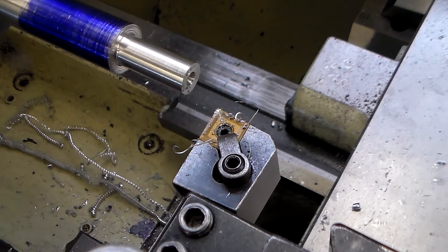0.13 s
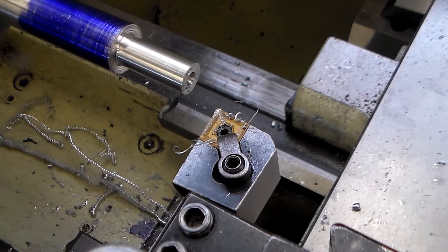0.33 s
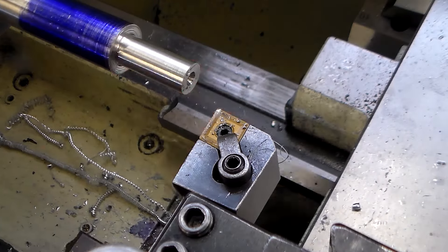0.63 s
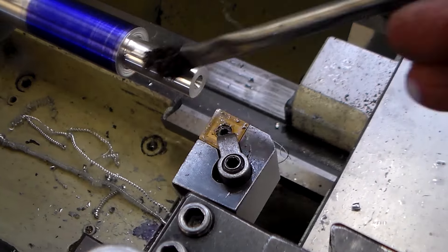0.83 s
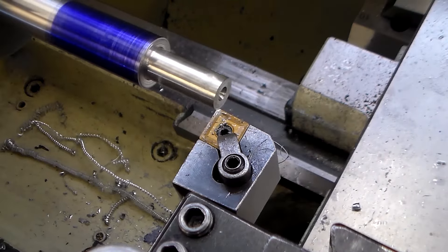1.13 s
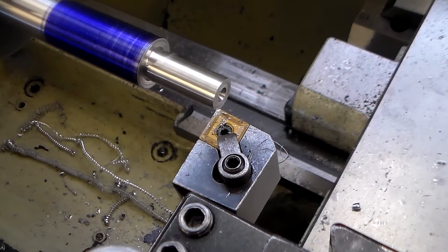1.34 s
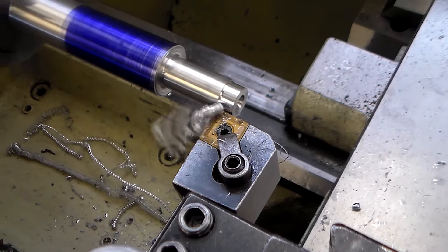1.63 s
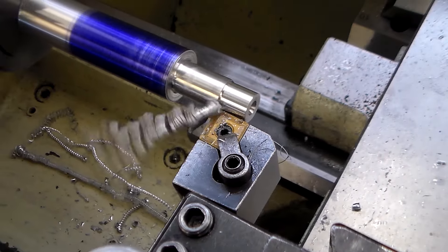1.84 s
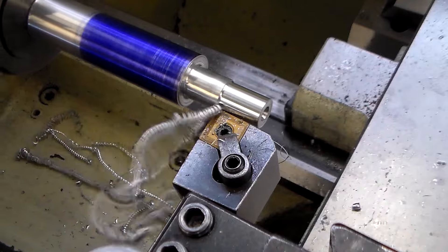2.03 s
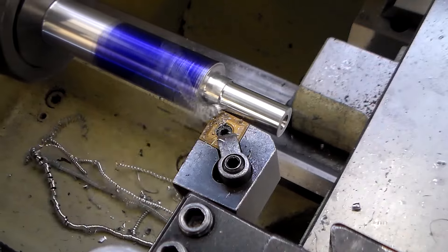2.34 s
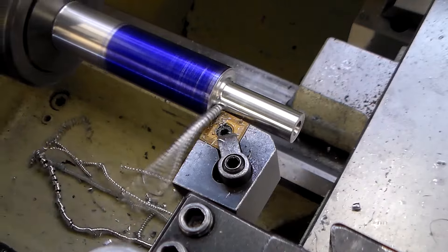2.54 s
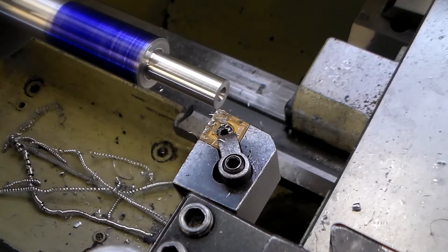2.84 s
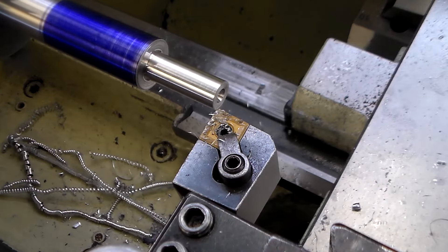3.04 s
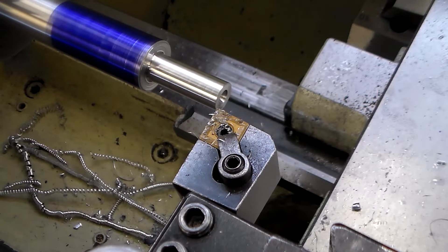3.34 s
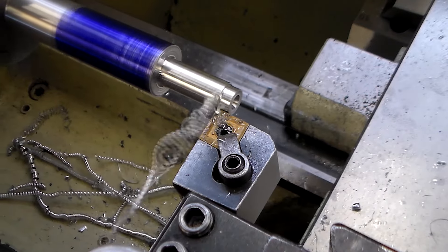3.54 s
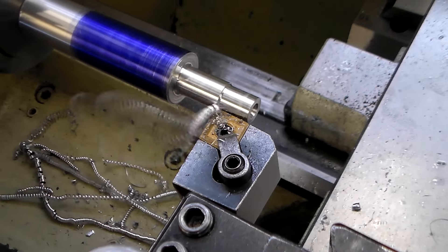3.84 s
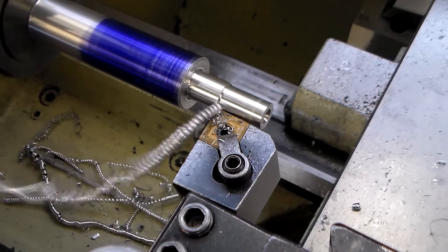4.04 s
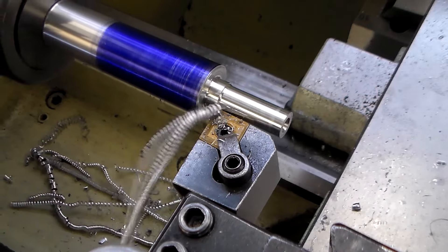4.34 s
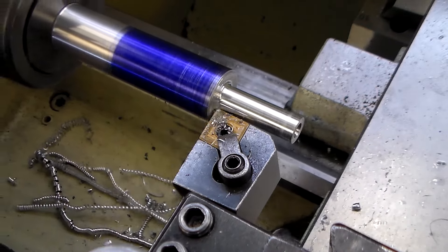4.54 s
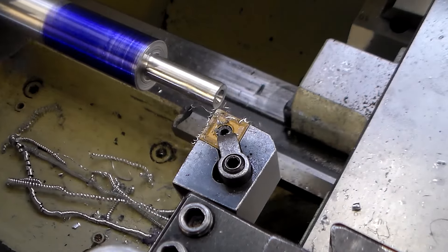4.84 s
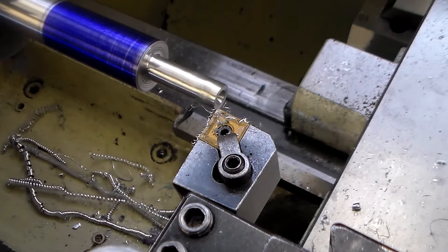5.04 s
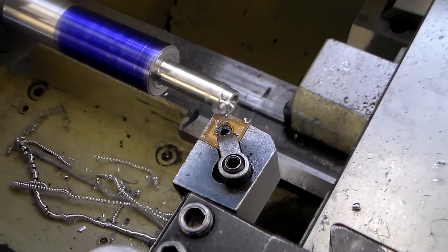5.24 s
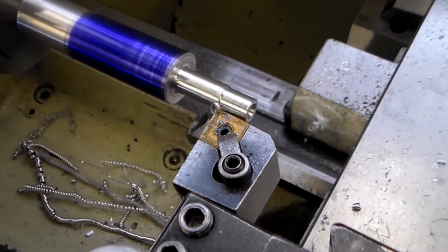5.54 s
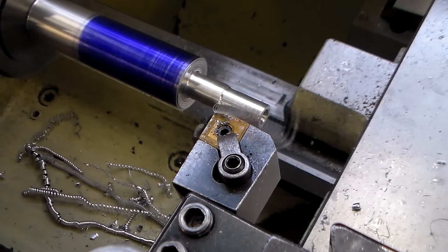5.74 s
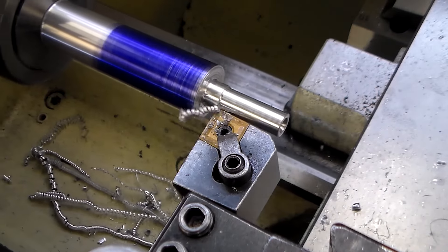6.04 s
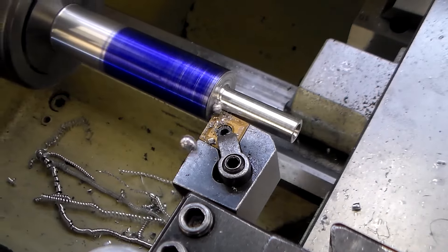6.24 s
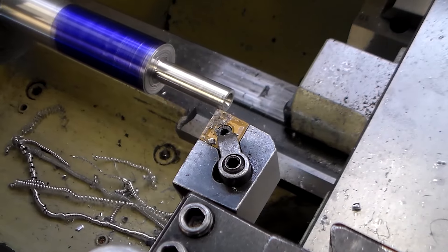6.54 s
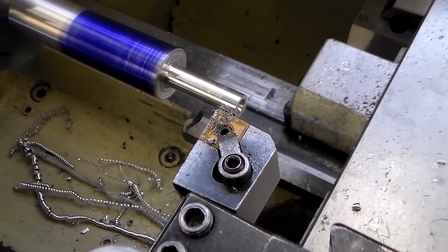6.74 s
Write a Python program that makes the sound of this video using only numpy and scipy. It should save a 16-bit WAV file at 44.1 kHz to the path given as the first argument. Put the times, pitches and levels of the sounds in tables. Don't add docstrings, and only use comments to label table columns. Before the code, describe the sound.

A close stereo camera microphone hears quiet airy fan noise and thin hum, then two hard clicks milliseconds apart. Immediately a motor rises in a quick chirp into a bright, dense, shrill drone, leaning slightly left. Three finishing passes make the tones dip a little and the hiss shift; soft pings of swarf on a tray come later. The whine never stops.

```python
import sys
import numpy as np
from scipy import signal
from scipy.fft import rfft, irfft, next_fast_len
from scipy.io import wavfile
from scipy.ndimage import uniform_filter1d, map_coordinates

SR = 44100
rng = np.random.default_rng(int(sys.argv[2]) if len(sys.argv) > 2 else 0)


def amplitude_ratio(level_db):
    exponent = np.asarray(level_db, float) / 20
    return 10 ** exponent


def waveform_to_disk(signal):
    frames = np.transpose(np.atleast_2d(signal))
    scaled = np.clip(frames, -1, 1) * 32767
    samples = np.round(scaled).astype(np.int16)
    wavfile.write(sys.argv[1], SR, samples)


N = 303408
TIME = np.arange(N) / SR

# [f/Hz, level/dB per Hz]
AIR = [(15, -63), (25, -15), (333, -15.5), (380, -14.5), (447, -8), (485, -17.5), (878, -18.5),
       (1500, -18.5), (1820, -18), (2080, -11.5), (2320, -14), (3050, -18), (3470, -20), (4670, -27.5),
       (15700, -22.5)]
# [f/Hz, width/Hz, level/dB]
AIR_HUMPS = [(2252, 42, 9), (2340, 36, 4.5), (2720, 55, 7.5), (2910, 42, 9), (4740, 660, 15.5),
             (5600, 100, 3), (7800, 1200, 9), (9760, 630, 6.5)]
# [f/Hz, likeness/0-1]
AIR_ALIKE = [(60, 0.25), (180, 0.48), (550, 0.62), (1650, 1), (4970, 1), (15000, 0.84)]
# [f/Hz, left-right/dB]
AIR_LEAN = [(60, 0.5), (180, 0.36), (550, 0.87), (1650, 6.5), (4970, 4.2), (15000, 0.5)]
# [f/Hz, level/dB]
HUM = [(449.3, -59), (899, -69), (1799, -68), (2258, -66), (2686, -68), (3165, -66), (3266, -57),
       (3919, -71), (4572, -61), (4749, -69), (5400, -67), (9502, -69), (13550, -73)]
# [t/s, level/dB, length/s]
BRUSHES = [
    (.01, -57, .03),
    (.27, -56, .03),
    (.51, -56, .06),
]
BRUSH_REST_DB = -68

# [t/s, peak/dB, thump/dB]
RELAY = [
    (.7793, -26, -40),
    (.7862, -18, -47),
]
# [f/Hz, level/dB, 60 dB decay/s]
RELAY_CASE = [(1400, -10, .012), (2300, -11, .007), (3000, -11, .007), (3900, -10, .006), (5300, -3, .025),
              (6500, -5, .006), (8300, -7, .015), (9500, -4, .006), (11500, -8, .005), (15500, -5, .008)]

# [t/s, peak/dB, f/Hz, 60 dB decay/s]
SWARF = [
    (3.44, -39, 3520, .07),
    (4.871, -35.5, 2680, .06),
    (5.37, -42.5, 3180, 0.092),
    (5.54, -39, 3550, 0.069),
    (5.87, -44, 5800, .05),
    (6.03, -38.5, 3180, .06),
    (6.05, -33, 3520, 0.052),
    (6.42, -58, 533, 0.17),
]

# [tool bites t/s, tool leaves t/s, depth/0-1]
CUTS = [
    (1.42, 2.715, 1),
    (3.395, 4.64, 0.84),
    (5.17, 6.26, 0.53),
]
BITE_S, LEAVE_S = 0.088, 0.21
CUT_HISS_DB, CUT_LOW_DB, CUT_STEP_DB, CUT_GAIN_DB = 0.78, -1.5, -6, -2
# [t/s, low tones/dB, hiss/dB]
JOLTS = [
    (1.36, 0, -0.5),
    (3.03, 2.5, -0.6),
    (3.43, 3, 0.5),
    (4.72, -3, -1.5),
    (4.82, 2.5, -.3),
    (5.24, 0, -0.7),
]
JOLT_S = 0.1
# [from t/s, to t/s, level reached/dB]
PULLS = [
    (1.6, 2.48, -60),
    (4.8, 7.2, -56),
]
PULL_GROWS_DB, PULL_REST_DB = 8.5, -69

# [t/s, step rate f/Hz]
RUNUP = [
    (.83, 900),
    (0.846, 1350),
    (0.86, 2375),
    (0.878, 3800),
    (0.895, 4380),
    (0.93, 4450),
]
FULL_RATE_HZ, STEP_HZ, STEPS_PER_TURN = 4450, 4448.5, 240
# [t/s, level/dB]
START = [
    (.8, -49),
    (.83, -25),
    (.8455, -19),
    (.8495, -10.5),
    (.87, -5.5),
    (.9, -4.5),
]
# [t/s, f/Hz]
WHINE = [
    (0.88, 2637),
    (0.94, 2654),
    (6.8, 2650),
    (6.88, 2670),
]
# [f/Hz, level/dB per Hz]
RUMBLE = [(15, -34), (25, -5.5), (192, -4.5), (289, -3), (726, -5.5), (827, -8.5), (1200, -23), (1560, -33),
          (2640, -120)]

# [order/cycles per turn, level/dB]
HALF_STEP = [(119, -59), (120, -60), (121, -61)]
# [order/cycles per turn, level/dB]
STEP = [(238, -64), (239, -61), (239.5, -64), (240, -48), (241, -57), (243.6, -62)]
# [order/cycles per turn, level/dB]
DOUBLE_STEP = [(472, -57), (473, -57), (474, -56), (475, -56), (476, -54), (477, -53), (478, -51),
               (479, -47), (480, -46), (481, -46), (482, -49), (483, -54), (484, -55)]
# [order/cycles per turn, level/dB]
TRIPLE_STEP = [(711, -59), (715, -60), (716, -56), (717, -55), (718, -55), (719.7, -60), (720.6, -57)]
# [order/cycles per turn, level/dB]
BELT = [(72, -69), (77.1, -73), (87, -71), (357.3, -58), (383.4, -57), (384, -58), (637, -62), (638, -63),
        (640, -63), (641, -61)]
# [trim/dB, left-right/dB, right lead/rad, share of cutting load]
HEARD = [
    (-0.5, 2.5, 0.52, 0.64),
    (1, 12, -2, 0.66),
    (1, 3, 0.47, 0.022),
    (1.5, -3, 0.5, .05),
    (2, 4, 1, .1),
]
RUNUP_GAIN = [
    -20,
    4,
    -5,
    -2,
    -30,
]

# [f/Hz, level/dB]
BETWEEN = [(600, -40), (1200, -24), (2500, -38), (5000, -16), (9000, -7), (15000, -11)]
# [f/Hz, width/Hz, level/dB, left-right/dB, right lead/rad]
FRAME_RESONANCES = [(1330, 70, -9, -2, 0.5), (1460, 120, -15, 0, 0.5), (1620, 90, -6, 1, 0.4), (1760, 160, -14, 3, 0.4),
                    (2000, 100, -11, 5, 0.2), (2220, 60, -5, 3, 0.1), (2370, 160, -9, 2, 0), (2530, 110, -8, 2, 0),
                    (2780, 210, -10, 3, 0.0), (3190, 90, -6, 2, 0.0), (3540, 430, -9, 2, 0.0), (4000, 260, -5, 1, 0.0),
                    (4310, 50, -3, -3, 0.6), (4380, 100, -1, -9, 2.0),
                    (4460, 60, -1, 10, -2.3), (4750, 110, -2, 4, 0.3), (4970, 160, -3, 2, 0.3), (5220, 90, 6, 3, 0.3),
         (5350, 140, -2, 2, 0.2), (5790, 40, -2, 3, 0.2), (6020, 340, -5, 9, 0.2), (6230, 40, 2, 4, 0.2),
         (6360, 110, -3, 4, 0.5), (6630, 90, 5, 0, 0.6), (6690, 90, 3, 7, 0.5), (6920, 80, -2, -1, 0.1),
         (7120, 80, 4, 2, 0.4), (7250, 70, 3, 2, 0.3),
                    (7540, 90, -7, 4, 0.2), (7740, 110, -2, 3, 0.3), (7920, 70, -4, 2, 0.3), (8170, 100, -1, 2, 0.3),
        (8310, 90, -2, 2, 0.4), (8440, 80, 1, 1, 0.4), (8640, 80, 3, 3, 0.4), (8760, 100, 4, 2, 0.3),
        (8900, 90, 7, 2, 0.4), (9040, 130, 1, 2, 0.3), (9290, 170, -2, 1, 0.3), (9460, 60, 0, 1, 0.3),
        (9650, 170, -2, 2, 0.2),
                    (10260, 170, 3, 1, 0.4), (11160, 100, -6, 0, 0.2), (11860, 80, -2, 0, 0.2),
          (12050, 150, -1, -2, 0.3), (12200, 120, -2, 0, 0.1), (13100, 480, -4, 1, 0.1),
          (13260, 180, 3, -2, 0.1), (13760, 80, -4, 0, 0.1), (14070, 340, -8, 0, 0.0),
          (14650, 230, -9, 0, 0.0), (15150, 320, -4, 0, 0.0), (15630, 160, 1, 0, 0.0),
          (15700, 60, -1, 0, 0)]


def unit(x):
    return x / np.sqrt(np.mean(x ** 2) + 1e-20)


def along(points, hz):
    f, v = np.transpose(points)
    return np.interp(np.log(hz + 1), np.log(f + 1), v)


def curves(rows):
    s, *cols = np.transpose(rows)
    return [np.interp(TIME, s, c) for c in cols]


def wobble(rate):
    return map_coordinates(rng.standard_normal(int(N * rate / SR) + 4), [TIME * rate])


def noise():
    return rng.standard_normal(N)


def hump(hz, centre, width, power=2):
    return 1 / (1 + ((hz - centre) / width) ** power)


def filtered(x, response):
    m = next_fast_len(N + 8192)
    return irfft(rfft(x, m) * response(np.fft.rfftfreq(m, 1 / SR)), m)[..., :N]


def sides(db):
    return amplitude_ratio(np.array([db / 2, -db / 2]))


def placed(x, db):
    return sides(db)[:, None] * x


def pair(shape, alike):
    def mid_side(hz):
        turn = np.arccos(np.clip(alike(hz), -1, 1)) / 2
        return shape(hz) * np.array([np.cos(turn), np.sin(turn)])

    mid, side = filtered(rng.standard_normal((2, N)), mid_side)
    return unit(np.array([mid + side, mid - side]))


def fan_air():
    def shape(hz):
        humps = sum(db * hump(hz, c, w) for c, w, db in AIR_HUMPS)
        return amplitude_ratio(along(AIR, hz) + humps)

    air = pair(shape, lambda hz: along(AIR_ALIKE, hz))
    air = filtered(air, lambda hz: sides(along(AIR_LEAN, hz)))
    return amplitude_ratio(-46.5 + 0.64 * wobble(2.9)) * air


def hum():
    out = 0
    for hz, db in HUM:
        level = amplitude_ratio(db + 3.5 + 0.65 * wobble(7.9))
        out = out + level * np.sin(2 * np.pi * hz * TIME + 0.7 * wobble(4.66))
    return placed(out, 1.5)


def belt_brush():
    hiss = unit(filtered(noise(), lambda hz: hump(hz, 8000, 300) + 0.98 * hump(hz, 9400, 300)))
    puffs = sum(amplitude_ratio(db) * np.exp(-((TIME - s) / length) ** 2) for s, db, length in BRUSHES)
    return (amplitude_ratio(BRUSH_REST_DB) + puffs) * hiss


def relay():
    out, t = np.zeros(N), TIME[:SR // 8]
    for s, db, thump_db in RELAY:
        ring = 0
        for hz, level, t60 in RELAY_CASE:
            ring = ring + amplitude_ratio(level + rng.normal(0, 1.2) - 60 * t / t60) * np.sin(2 * np.pi * hz * t)
        fade = amplitude_ratio(-60 * t / 0.0021) + 0.13 * amplitude_ratio(-60 * t / 0.027)
        crack = fade * signal.lfilter([1, -.9], 1, rng.standard_normal(len(t)))
        thump = amplitude_ratio(thump_db + 15 - 60 * t / 0.066) * np.sin(2 * np.pi * 35 * t)
        onset = 1 - np.exp(-t / 0.00017)
        out[round(s * SR):][:len(t)] += amplitude_ratio(db - 6.5) * ((ring + 2.2 * crack) * onset + thump)
    return placed(out, 5.3)


def swarf():
    out, t = np.zeros(N + SR), TIME[:SR // 4]
    for s, db, hz, t60 in SWARF:
        level = amplitude_ratio(db + 11.5 - 60 * t / t60) * (1 - np.exp(-t / 0.0044))
        ping = level * np.sin(2 * np.pi * hz * t + 1.3 * wobble(147)[:len(t)])
        out[round(s * SR):][:len(t)] += ping
    return placed(out[:N], 2.)


def cutting():
    load = 0
    for bite, leave, depth in CUTS:
        rise, fall = (TIME - bite) / BITE_S, 1 - (TIME - leave) / LEAVE_S
        load = load + depth * np.clip(np.minimum(rise, fall), 0, 1)
    return load


def rumble(on):
    low_noise = unit(filtered(noise(), lambda hz: amplitude_ratio(along(RUMBLE, hz))))
    return placed(amplitude_ratio(-48.0) * on * low_noise, 25.1) / 4


def feed_drive(on):
    level = amplitude_ratio(PULL_REST_DB)
    for start, end, db in PULLS:
        left = np.clip((end - TIME) / (end - start), 0, 1)
        level = level + amplitude_ratio(db - PULL_GROWS_DB * left) * (TIME > start) * (TIME < end)
    return on * level * unit(filtered(noise(), lambda hz: hump(hz, 1040, 35)))


def drive_whine():
    phase = 2 * np.pi * np.cumsum(curves(WHINE)[0]) / SR + 0.12 * wobble(30)
    whine = amplitude_ratio(-32.5 + 0.18 * wobble(13)) * np.sin(phase)
    return placed(whine * np.clip((TIME - .862) / 0.018, 0, 1), 4.7)


def frame_response(hz):
    power, lead = np.array([1, 1])[:, None] * amplitude_ratio(2 * along(BETWEEN, hz)), 0
    for c, w, db, pan_db, rad in FRAME_RESONANCES:
        peak = amplitude_ratio(2 * db) / (1 + (2 * (hz - c) / w) ** 2) ** 1.5
        power = power + peak * sides(2 * pan_db)[:, None]
        lead = lead + peak * rad
    return np.sqrt(power) * np.exp(1j * np.array([-.5, .5])[:, None] * lead / power.mean(0))


def swelling(x, swell_db):
    z = signal.stft(x, nperseg=512)[2]
    field = uniform_filter1d(rng.standard_normal(z.shape[1:]), 14, 0)
    field = uniform_filter1d(field, 50, 1)
    return signal.istft(z * amplitude_ratio(swell_db * unit(field)), nperseg=512)[1][:, :N]


def shaken_frame(turns, on, cut):
    pattern = rng.standard_normal(2380)[(turns % 1 * 2380).astype(int)]
    throb = map_coordinates(rng.standard_normal(12), [turns % 1 * 12], mode="grid-wrap")
    rub = noise() + .25 * pattern
    rub *= amplitude_ratio(.5 * throb + 0.36 * wobble(60) + 0.13 * wobble(11) + 0.35 * wobble(300))
    apart = filtered(rng.standard_normal((2, N)),
                     lambda hz: 0.18 + .5 * hump(hz, 0, 1800, 4) + 0.16 * hump(hz, 6000, 700))
    body = unit(filtered(on * (rub + apart), frame_response))
    low = filtered(body, lambda hz: hump(hz, 0, 2000, 8))
    jolt_db, jolt_hiss_db = sum(np.outer(db, np.exp(-((TIME - s) / JOLT_S) ** 2)) for s, *db in JOLTS)
    hiss = amplitude_ratio(CUT_HISS_DB * cut + jolt_hiss_db - 27.5) * swelling(body - low, swell_db=0.68)
    return hiss + amplitude_ratio(CUT_LOW_DB * cut + jolt_db - 28.5 + 0.51 * wobble(5.6)) * low


def step_tones(turns, speed, load_db):
    out, slow = 0, np.clip(12 * (1 - speed), 0, 1)
    families = (HALF_STEP, STEP, DOUBLE_STEP, TRIPLE_STEP, BELT)
    for family, (trim_db, pan_db, rad, share), slow_db in zip(families, HEARD, RUNUP_GAIN):
        strongest = max(family, key=lambda row: row[1])[0]
        lines = 0
        for order, db in family:
            phase = 2 * np.pi * (order * turns + (order - strongest) ** 2 / 9)
            phase = phase + .25 * wobble(12) + .8 * slow * wobble(500)
            level = amplitude_ratio(db + 0.19 * wobble(14)) * (1 - slow * (order != strongest))
            lines = lines + level * np.sin(phase)
        lines *= amplitude_ratio(trim_db + share * load_db + slow * (slow_db + 4.9 * wobble(700)))
        port = sides(pan_db) * np.exp([-.5j * rad, .5j * rad])
        out = out + filtered(lines, lambda hz: port[:, None] + 0 * hz)
    return out * np.clip((TIME - .8485) / .0015, 0, 1)


def spindle():
    cut, on = cutting(), amplitude_ratio(curves(START)[0])
    speed = np.where(TIME < .93, curves(RUNUP)[0] / FULL_RATE_HZ, 1)
    speed = speed * (1 + .0002 * wobble(4) + .0002 * wobble(15))
    turns = np.cumsum(speed) * STEP_HZ / STEPS_PER_TURN / SR
    tones = on * amplitude_ratio(14) * step_tones(turns, speed, CUT_STEP_DB * cut + 3)
    return rumble(on) + feed_drive(on) + drive_whine() + shaken_frame(turns, on, cut) + tones


def scene():
    return fan_air() + hum() + belt_brush() + relay() + swarf() + spindle()


def weak_moments(x):
    block = 1024
    band = filtered(x, lambda hz: hump(hz, 2985, 100, 14))
    power = band.mean(0) ** 2
    power = uniform_filter1d(power, 2 * block) / uniform_filter1d(power, SR)
    power = power[::block].repeat(block)[:N]
    running = TIME > .9
    weak = running * (power < np.quantile(power[running], .5))
    return uniform_filter1d(weak * 1., SR // 120) * band


def low_pass(x):
    return signal.sosfilt(signal.butter(12, 17010, fs=SR, output="sos"), x)


def record(dry):
    gain_db = np.clip((TIME - .85) / 0.064, 0, 1) * (-3.5 + CUT_GAIN_DB * cutting())
    x = filtered(dry * amplitude_ratio(gain_db), lambda hz: hump(hz, 0, 15740, 800))
    return low_pass(x - weak_moments(x))


dry = scene()
out = record(dry)
waveform_to_disk(out)
```